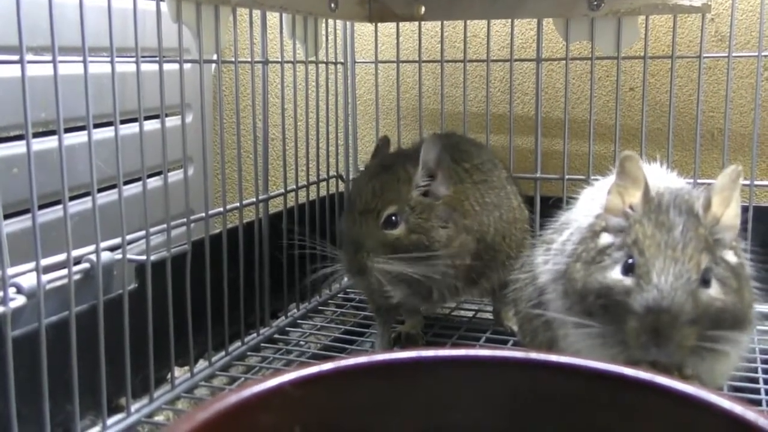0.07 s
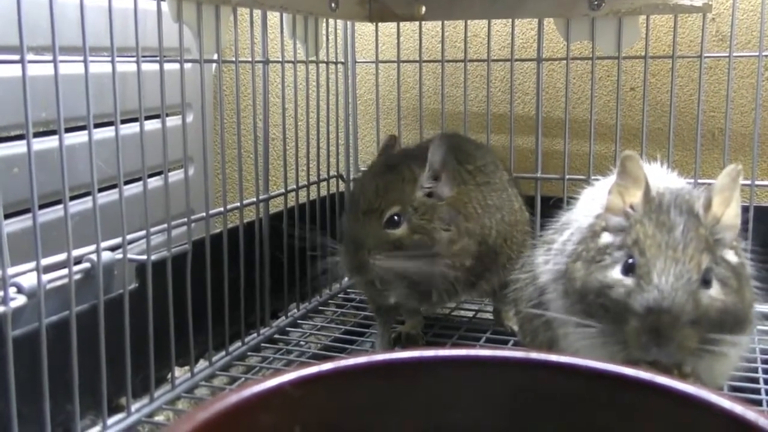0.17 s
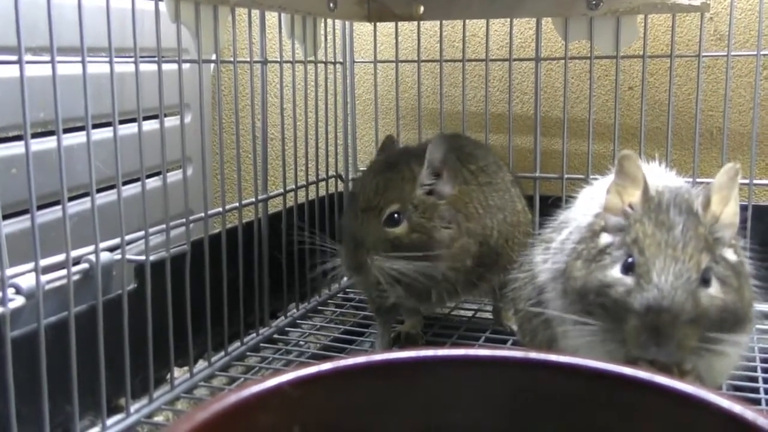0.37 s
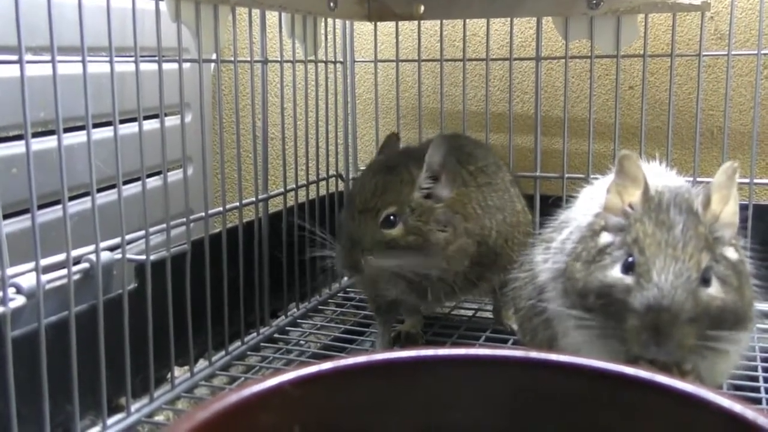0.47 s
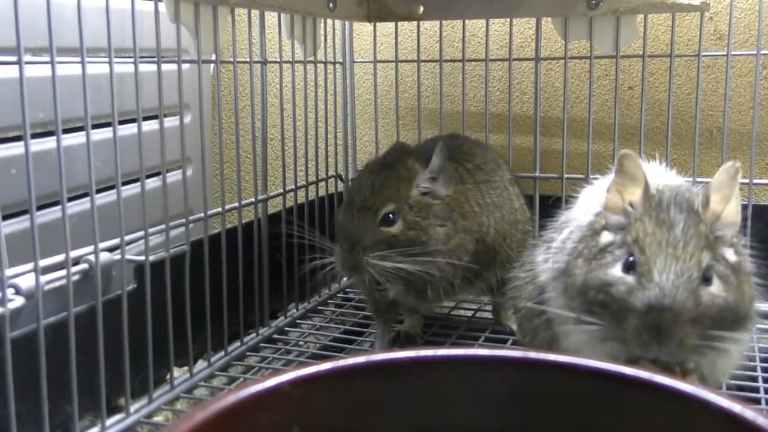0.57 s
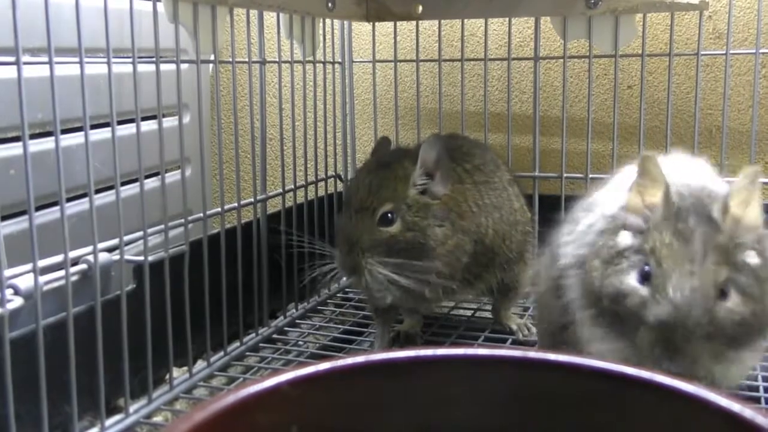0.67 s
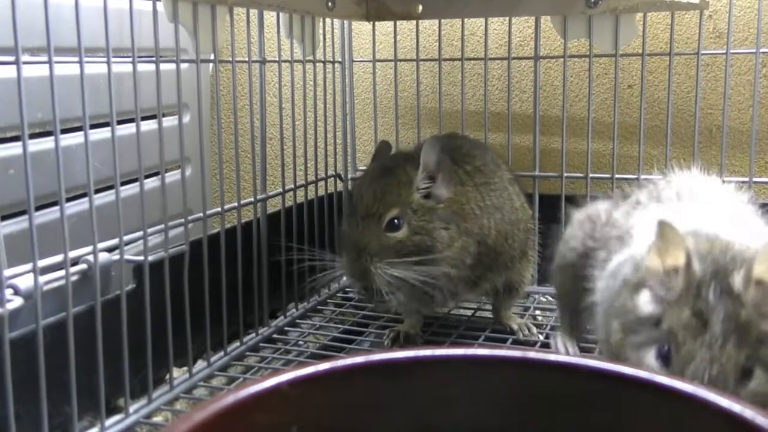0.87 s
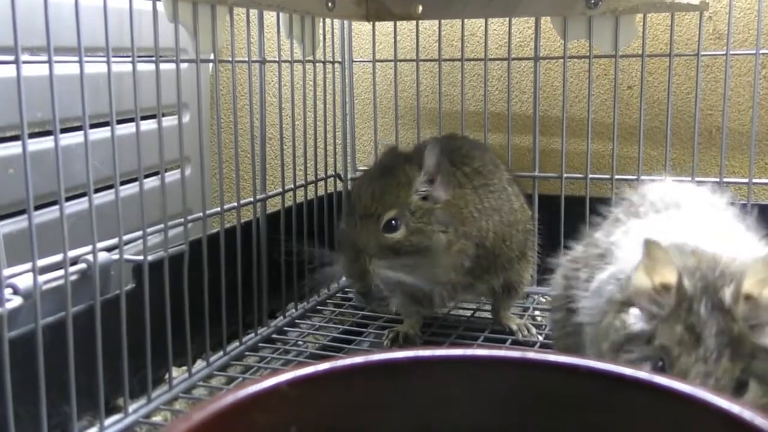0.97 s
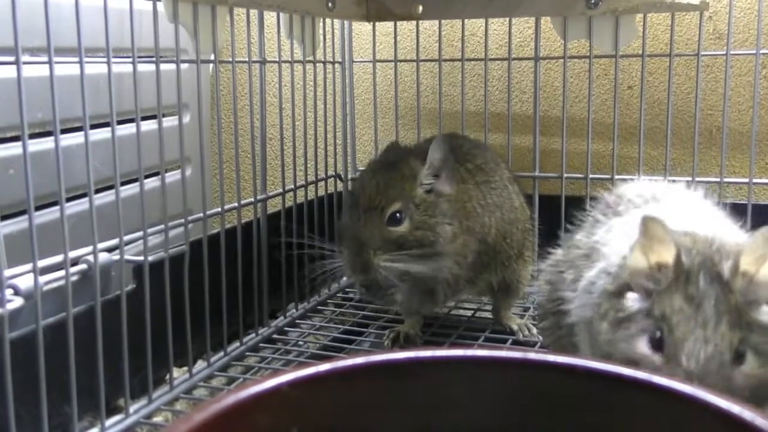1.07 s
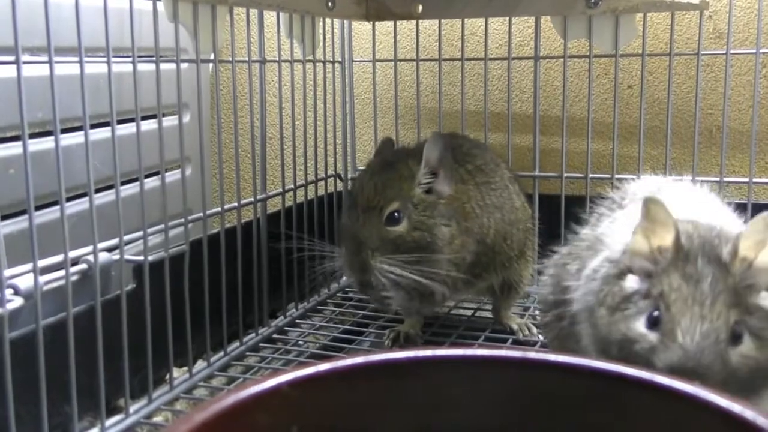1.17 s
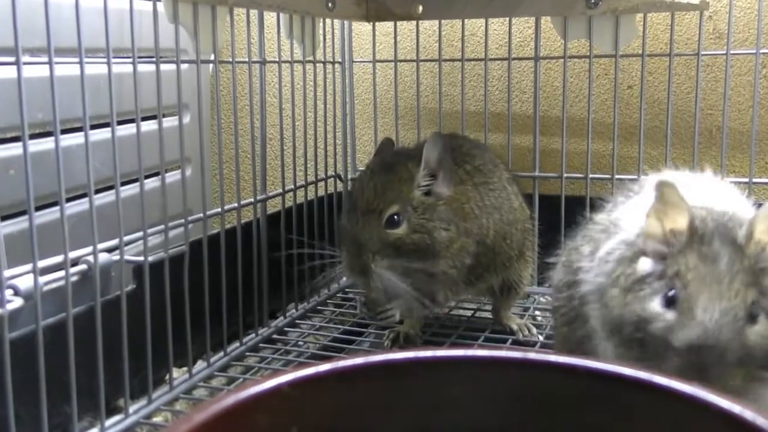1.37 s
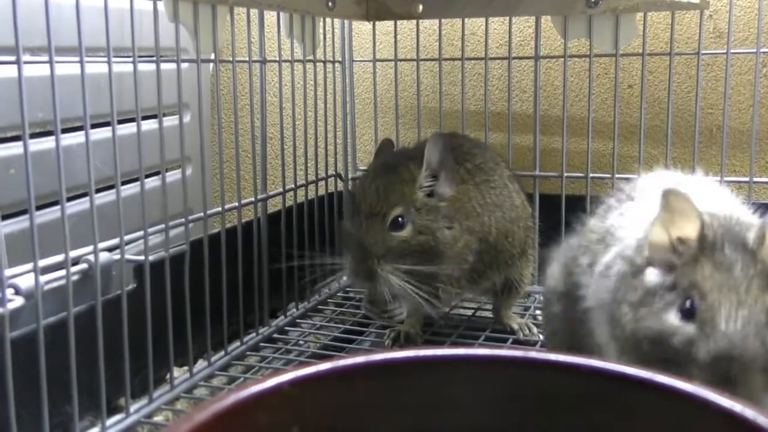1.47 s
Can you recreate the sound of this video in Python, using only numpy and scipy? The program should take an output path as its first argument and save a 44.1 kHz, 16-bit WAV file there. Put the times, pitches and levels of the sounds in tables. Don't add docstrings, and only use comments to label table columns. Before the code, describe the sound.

Three short shrill degu squeaks in a wire cage, claw clicks, soft pulsing machine air behind

```python
import sys
import numpy as np
from scipy import signal
from scipy.fft import rfft, irfft, next_fast_len
from scipy.io import wavfile
from scipy.ndimage import uniform_filter1d, minimum_filter1d, map_coordinates

SR = 44100
rng = np.random.default_rng(int(sys.argv[2]) if len(sys.argv) > 2 else 0)


def elevation(decibels):
    levels = np.asarray(decibels, float)
    return 10 ** (levels / 20)


def to_wav(sig):
    pcm = np.clip(np.atleast_2d(sig), -1, 1) * 32767
    pcm = np.round(pcm).astype(np.int16)
    wavfile.write(sys.argv[1], SR, pcm.T)


N = 66150
T = np.arange(N) / SR
SIDES = np.array([[0.5], [-0.5]])


def unit(x):
    return x / np.sqrt(np.mean(x ** 2) + 1e-20)


def along(points, hz):
    f, v = np.transpose(points)
    return np.interp(np.log(hz + 1), np.log(f + 1), v)


def wobble(rate):
    knots = rng.standard_normal(int(N * 2000 / SR) + 4)
    return map_coordinates(knots, [T * min(rate, 2000)])


def filtered(x, response):
    m = next_fast_len(N + SR // 2)
    return irfft(rfft(x, m) * response(np.fft.rfftfreq(m, 1 / SR)), m)[..., :N]


def panned(points):
    return lambda hz: elevation(along(points, hz) * SIDES)


def resonances(peaks, hz):
    return sum(db / (1 + (2 * (hz - centre) / width) ** 2) for centre, width, db in peaks)


def squeaks():
    # t/s, pitch f/Hz, level/dB, brightness/dB per overtone,
    # roughness/0-1, half-pitch share/0-1
    first = [
        [(.2458, 2603, -33, 6, 0.65, 0.2), (.2475, 2827, -23.5, 2, 0.77, 0.1), (.253, 3140, -22, 4.5, 0.65, 0),
         (.259, 3600, -22.5, 5.5, 0.08, .1), (.266, 3794, -15, 1, 0.06, .06), (.283, 3885, -18, 0, 0, 0),
         (.292, 3780, -14.5, 3, 0, 0), (.296, 3660, -17, 1, 0.04, 0), (.3045, 3680, -19.5, 2.5, 0, 0)],
        [(.3065, 3730, -26.5, -2, 0, 0.1), (.311, 4024, -22, 4, 0.05, 0.08), (.317, 3820, -34, -9, 0.12, .01),
         (.323, 4010, -48, -5, .1, .01)],
    ]
    second = [
        [(.6098, 3640, -26.5, 5.5, 0.34, .12), (.6118, 3635, -15.5, 1.5, .03, 0.15),
         (.618, 3664, -19.5, 2.5, .01, 0.088), (.622, 3800, -18, -1, .02, 0.12),
         (.627, 3828, -15.5, 0.5, .02, 0.17), (.636, 3820, -17.5, -0.5, .01, 0.07),
         (.642, 3860, -18.5, -2, .005, .008), (.652, 3904, -19.5, -3, 0.0057, .005),
         (.66, 3900, -24, 2.5, 0.027, .005)],
        [(.6615, 4100, -22.5, -3, 0.39, 0.063), (.665, 4160, -25, 5, 0.11, 0.041),
         (.67, 4206, -32.5, -7.5, .1, .02), (.678, 4260, -52, -14, .08, .02)],
    ]
    third = [
        [(1.0402, 2228, -27, -1.5, 0.59, .1), (1.044, 2338, -23.5, 0, .6, .15),
         (1.05, 2774, -21.5, -0.5, 0.76, 0.22), (1.059, 3413, -21, 3.5, .4, 0.066),
         (1.065, 3650, -20.5, 5.5, .2, .05), (1.071, 3806, -19, -2, .07, 0.035),
         (1.082, 3887, -20.5, -2, .03, .01), (1.09, 3843, -22, 2.5, .01, .005),
         (1.0955, 3843, -17.5, 1.5, .011, .005)],
        [(1.098, 4110, -27.5, 0.49, .08, .01), (1.102, 4150, -21.5, 1, .036, .01),
         (1.108, 4130, -20.5, -0.6, .05, .01), (1.113, 3850, -29.5, -2.7, 0.11, .01),
         (1.119, 3480, -35.5, -2.2, 0.16, 0.0092)],
    ]
    # f/Hz, level/dB
    throat = [(2000, -13), (3000, -5.5), (3900, -9), (5500, -3.5), (7500, -0.5), (9500, -0.5), (11500, 0),
              (15500, -14.5)]
    # f/Hz, level/dB per Hz
    breath_colour = [(2000, -46), (3500, -18), (4600, -15), (6000, 3.5), (9000, -4.5), (12500, 8.5),
                     (15500, -17)]
    jitter, jitter_rate = 0.035, 900
    flutter_db, flutter_rate = 4, 1300
    shimmer_db, shake_db = 0.8, 2.5
    half_tilt_db, rasp = 5, 1.3

    out = np.zeros(N)
    shake = wobble(jitter_rate)
    k = np.arange(2, 15)[:, None] / 2
    is_half = k % 1 > 0
    breath = unit(filtered(rng.standard_normal(N), lambda hz: elevation(along(breath_colour, hz))))
    fast = np.array([wobble(flutter_rate) for _ in k])
    slow = np.array([wobble(150) for _ in k])
    for whistle, flip in (first, second, third):
        s, *cols = np.transpose(whistle + flip)
        i = slice(round(s[0] * SR), round(s[-1] * SR))
        hz, db, bright, rough, half = [np.interp(T[i], np.maximum.accumulate(s), c) for c in cols]
        rough = np.clip(rough, 0, 1)
        turns = np.cumsum(hz * (1 + jitter * rough * shake[i])) / SR
        flutter = flutter_db * rough * np.sqrt(k) * np.minimum(fast[:, i], 1)
        shimmer = shimmer_db * (1 + 2 * is_half) * slow[:, i]
        half_share = np.clip(half, 0, 1) * elevation(half_tilt_db * np.minimum(k - 2.5, 0))
        size = elevation(along(throat, k * hz) + bright * (k - 2) + flutter + shimmer)
        size = size * np.where(is_half, half_share, 1) * (k * hz < 17000)
        tone = (size * np.sin(2 * np.pi * (k * turns + rng.random(k.shape)))).sum(0)
        edge = np.clip(np.minimum(T[i] - s[0], s[-1] - T[i]) / 0.00028, 0, 1)
        voice = np.sqrt(1 - rough ** 2) * tone + rasp * rough ** 1.16 * breath[i]
        out[i] += elevation(db + shake_db * rough * shake[i]) * edge * voice
    return out


def cage(x):
    # f/Hz, t60/s
    decay = [(1000, .06), (4000, .05), (15000, .038)]
    gap_s, alike = 0.0015, 0.6
    a, b = rng.standard_normal((2, SR // 5))
    turn = np.arccos(np.clip(alike, 0, 1)) / 2
    noise = np.cos(turn) * a + np.sin(turn) * b * np.array([[1], [-1]])
    hz, t, z = signal.stft(noise, SR, nperseg=128)
    tail = signal.istft(z * elevation(-60 * t / along(decay, hz)[:, None]), SR, nperseg=128)[1]
    delayed = np.pad(x, (round(gap_s * SR), 0))[None]
    return signal.fftconvolve(delayed, tail / np.linalg.norm(tail[0]), axes=1)[:, :N]


def voice_in_cage():
    # f/Hz, width/Hz, gain/dB
    tray = [(3640, 150, -10.5), (4630, 220, 4), (7626, 122, -18.5), (11273, 220, -18)]
    # f/Hz, left-right difference/dB
    voice_pan = [(3000, -0.5), (5000, 0.5), (9000, 0.5), (15000, 3.5)]
    # f/Hz, phase/rad
    voice_lead = [(3000, -0.69), (8000, 0.085), (14000, -1.09)]
    voice = squeaks()

    def path(hz):
        lead = np.exp(1j * along(voice_lead, hz) * SIDES)
        return elevation(resonances(tray, hz)) * panned(voice_pan)(hz) * lead

    return filtered(voice + elevation(-8.5) * cage(voice), path)


def steps():
    # t/s, peak level/dB
    ticks = [(0.342, -37), (0.5341, -23.5), (0.5478, -31.5), (0.564, -13.5), (0.568, -31),
             (0.588, -30.5), (0.594, -29), (.597, -31.5), (0.603, -31), (1.214, -46), (1.348, -41)]
    # f/Hz, level/dB, t60/s
    mesh = [(2150, -28, 0.026), (5150, 8, 0.03), (8600, 12, 0.018), (12310, -9, .02)]
    # f/Hz, level/dB per Hz
    scrape_colour = [(410, -35), (700, -16), (2040, -2.5), (4520, -9.5), (5350, -3), (12700, -9.5),
                     (15800, -17)]
    scrape_t60_s, snap_t60_s, attack_s = 0.035, 0.0087, 0.00037
    snap_db, ring_db, pan_db = 0, -1.5, 0.5

    out = np.zeros((2, N + SR))
    t = np.arange(SR // 10) / SR
    noise = rng.standard_normal((2, N)) + 2 * rng.standard_normal(N)
    scrape = unit(filtered(noise, lambda hz: elevation(along(scrape_colour, hz))))
    fade = elevation(-60 * t / scrape_t60_s) + elevation(snap_db - 60 * t / snap_t60_s)
    attack = 1 - np.exp(-t / attack_s)
    for s, db in ticks:
        ring = sum(elevation(mode_db + rng.normal(0, 3.9) - 60 * t / t60) * np.sin(2 * np.pi * hz * t)
                   for hz, mode_db, t60 in mesh)
        i = round(s * SR)
        hit = elevation(ring_db) * ring / np.abs(ring).max() + fade * scrape[:, i:i + len(t)]
        out[:, i:i + len(t)] += elevation(db - 13.5 + pan_db * SIDES) * hit * attack
    return out[:, :N]


def rush(spectrum, alike, pan):
    # f/Hz, width/Hz, level/dB over the noise
    duct = [(326, 10.7, 8.5), (729, 57, 12.5), (1175.3, 12.2, 11), (1310, 84, 1), (1410, 20, 3)]

    def colour(hz):
        turn = np.arccos(np.clip(along(alike, hz), -1, 1)) / 2
        return elevation(along(spectrum, hz) + resonances(duct, hz)) * [np.cos(turn), np.sin(turn)]

    mid, side = filtered(rng.standard_normal((2, N)), colour)
    return unit(filtered(np.array([mid + side, mid - side]), panned(pan)))


def machine():
    # t/s, level/dB, rise/s, t60/s
    puffs = [
        (-.03, -42, 0.023, 0.24),
        (0.178, -38.5, 0.028, 0.35),
        (0.391, -41.5, 0.03, 0.16),
        (0.587, -44, 0.033, 0.21),
        (0.818, -38, 0.023, 0.21),
        (0.988, -38.5, 0.034, 0.22),
        (1.225, -43, 0.023, 0.27),
        (1.401, -37.5, 0.027, 0.24),
    ]
    # f/Hz, level/dB per Hz
    hum_colour = [(13, -37), (22, -13.5), (102, -0.5), (222, 0.5), (304, -1), (484, -2.5), (601, -13.5),
                  (713, -13.5), (900, -23), (1170, -62), (1980, -120)]
    hiss_colour = [(530, -24), (900, -16.5), (1170, -8), (2190, -18), (2490, -17), (3750, -25),
                   (15800, -35)]
    jet_colour = [(530, -17), (900, -16.5), (1170, -5), (1830, -17), (4430, -7), (6280, -20.5),
                  (7980, -16.5), (12100, -18.5), (15800, -17.5)]
    # f/Hz, left-right likeness/0-1
    steady_alike = [(60, 0.84), (180, 0.92), (550, 0.93), (1650, 0.7), (4970, 0.74), (15000, 0.81)]
    jet_alike = [(60, 0.84), (380, 0.56), (2380, 0.52), (15000, 0.85)]
    # f/Hz, left-right difference/dB
    steady_pan = [(60, 2), (950, -0.5), (15000, -1.5)]
    jet_pan = [(400, -4), (2400, -5), (15000, 1.5)]

    def strokes(life, grows):
        total = 0
        for s, db, rise, t60 in puffs:
            fall_db = 60 * np.clip(T - s - rise, 0, 9) / (life * t60)
            swell = np.sin(np.pi / 2 * np.clip((T - s) / rise, 0, 1)) ** 2
            total = total + elevation(db + grows * (db + 37.5) - fall_db) * swell
        return total

    hum_gain = elevation(-48.5 + 1.23 * wobble(8.15))
    hum = hum_gain * rush(hum_colour + [(1000, -120)], steady_alike, steady_pan)
    hiss_gain = elevation(-50 + 3.4 * wobble(12.19) + 0.62 * wobble(44.9))
    hiss = hiss_gain * rush([(800, -120)] + hiss_colour, steady_alike, steady_pan)
    jet = elevation(2.7 * wobble(150)) * rush([(600, -120)] + jet_colour, jet_alike, jet_pan)
    body = filtered(jet, lambda hz: 1 / (1 + (hz / 5200) ** 4))
    treble = jet - body
    return hum + hiss + strokes(1.17, 0) * body + strokes(0.59, 0.089) * treble


def ducking():
    # t down/s, t up/s, depth level/dB
    ducks = [
        (0.259, 0.324, -12),
        (0.582, 0.65, -4.5),
        (1.06, 1.101, -9.5),
    ]
    fall_s, rise_s = 0.041, 0.049

    def ramp(s, width):
        return 1 / (1 + np.exp(np.clip((s - T) * 4 / width, -50, 50)))

    return elevation(sum(db * ramp(down, fall_s) * (1 - ramp(up + rise_s, rise_s)) for down, up, db in ducks))


def scene():
    return voice_in_cage() + steps() + ducking() * machine()


def masked(x):
    above_db, below_db, hole_db = 25, 36, -35
    hz, _, z = signal.stft(x, SR, nperseg=512, noverlap=384)
    power = np.add.reduceat((np.abs(z) ** 2).sum(0), np.arange(0, len(hz), 4), axis=0)
    band_db = 10 * np.log10(uniform_filter1d(power, size=5, axis=1) + 1e-14)
    under = -minimum_filter1d(-band_db, size=5, axis=0, origin=2) - above_db
    over = -minimum_filter1d(-band_db, size=5, axis=0, origin=-2) - below_db
    hidden = (band_db < np.maximum(under, over))[np.arange(len(hz)) // 4]
    return signal.istft(z * elevation(hole_db * hidden), SR, nperseg=512, noverlap=384)[1][:, :N]


def top_cut(x):
    return signal.sosfilt(signal.butter(12, 16470, fs=SR, output="sos"), x)


def record(dry):
    limited = filtered(dry, lambda hz: 1 / (1 + (hz / 15820) ** 200))
    mix = masked(limited)
    return top_cut(mix)


dry = scene()
out = record(dry)
to_wav(out)
```